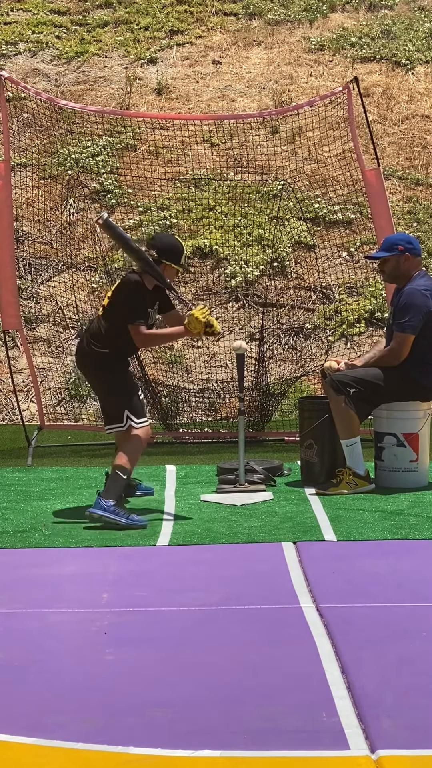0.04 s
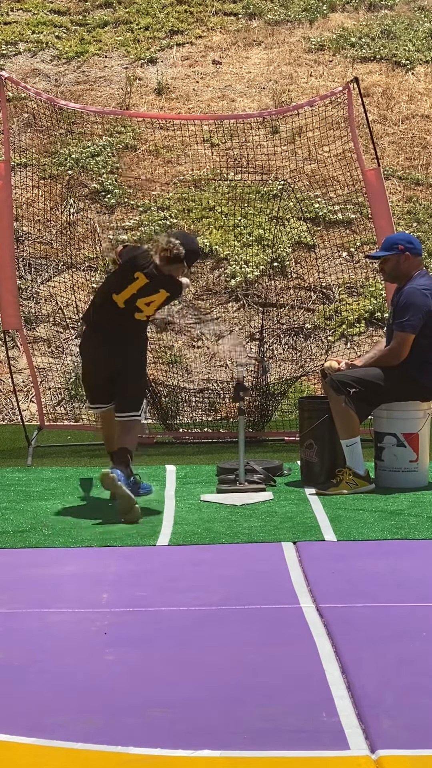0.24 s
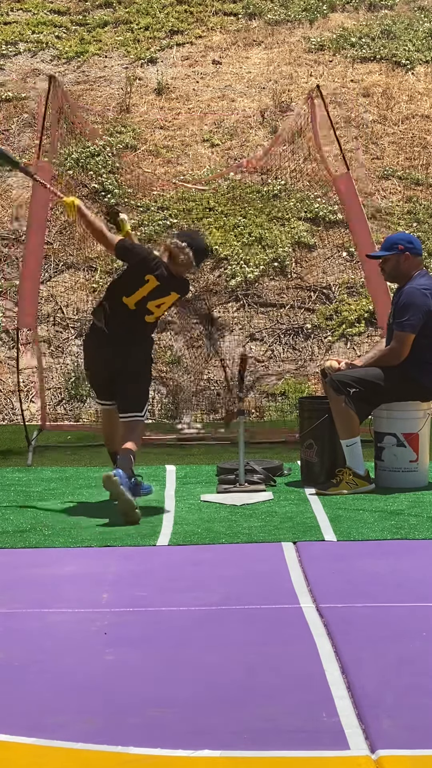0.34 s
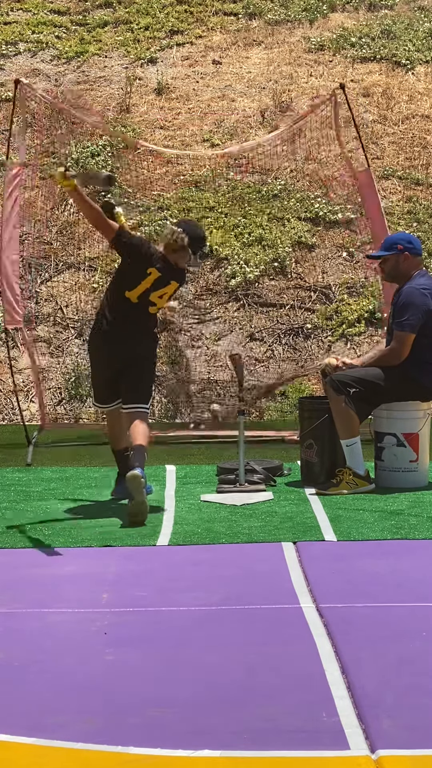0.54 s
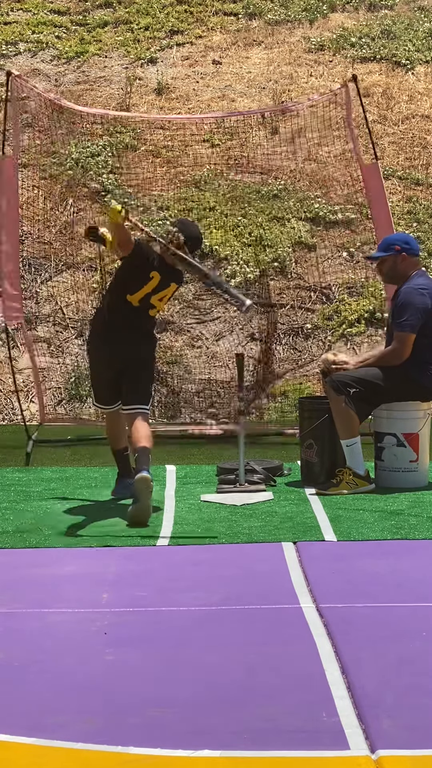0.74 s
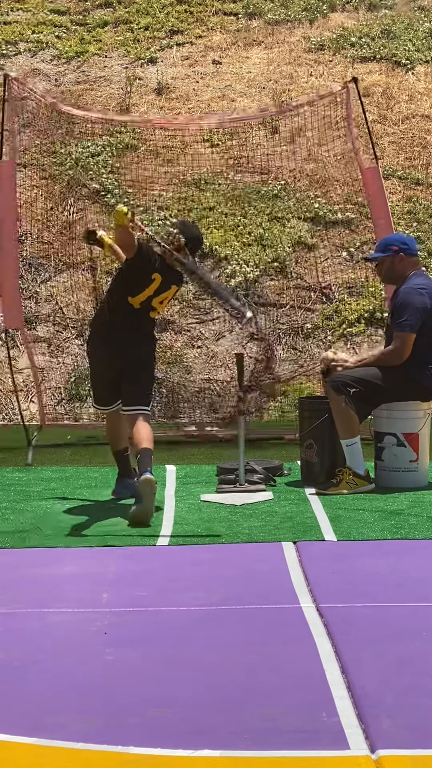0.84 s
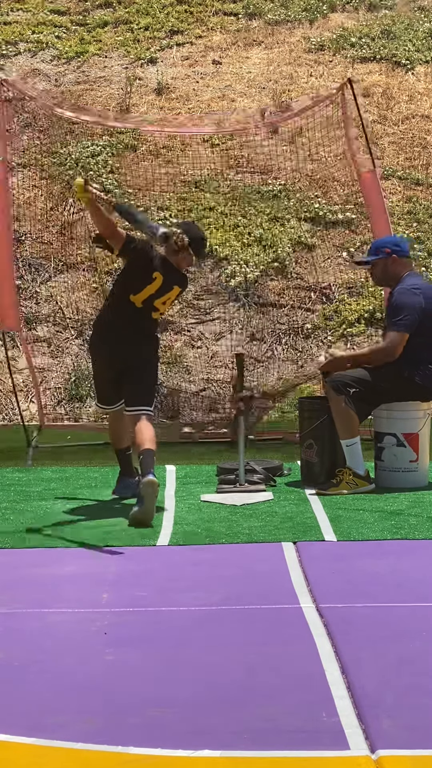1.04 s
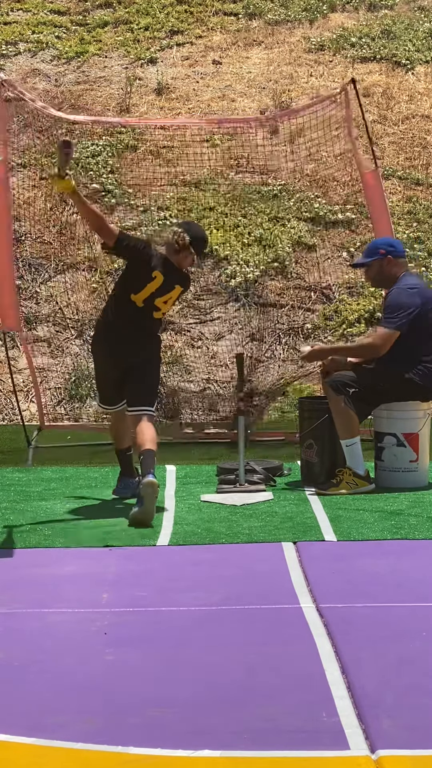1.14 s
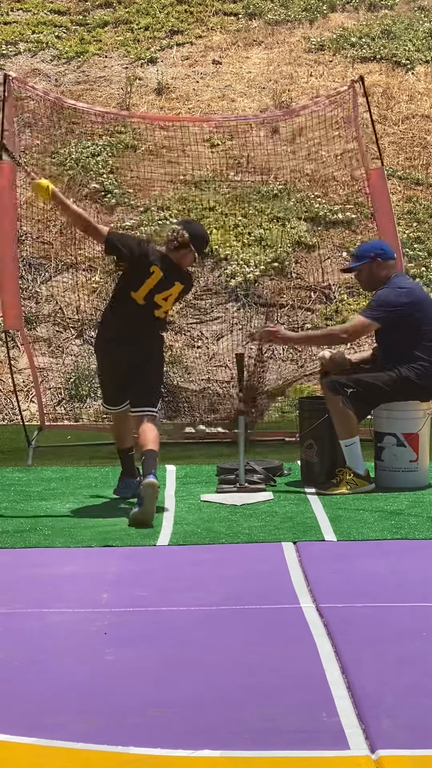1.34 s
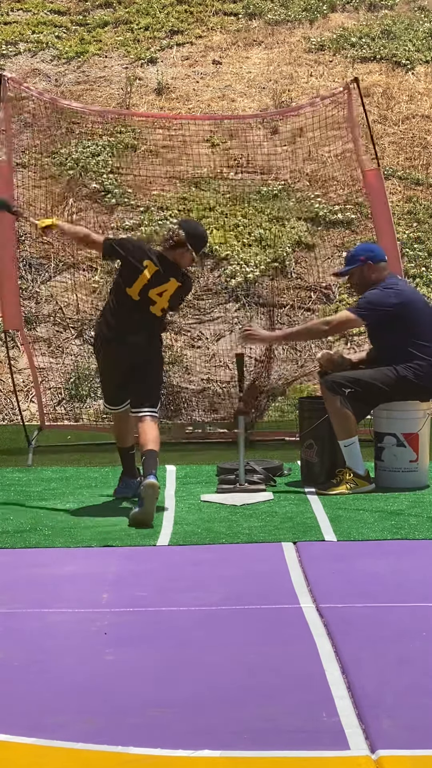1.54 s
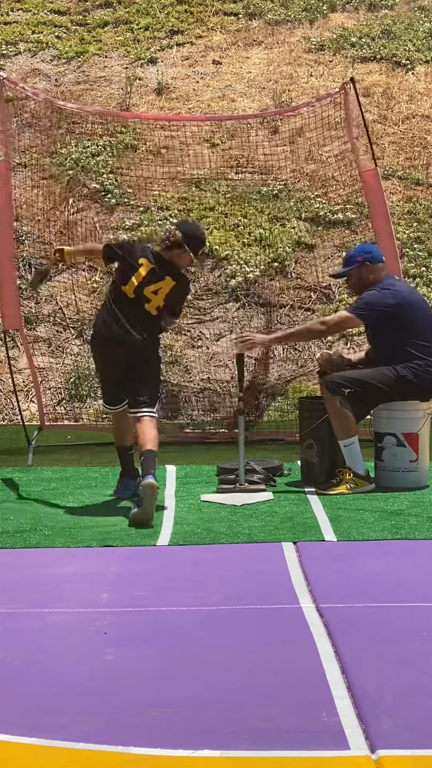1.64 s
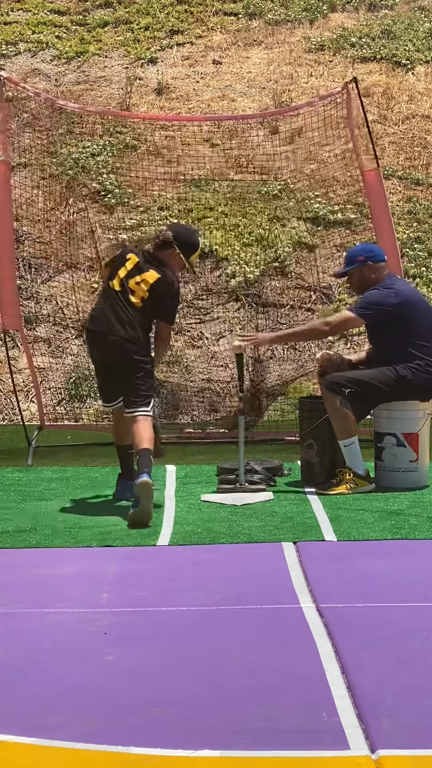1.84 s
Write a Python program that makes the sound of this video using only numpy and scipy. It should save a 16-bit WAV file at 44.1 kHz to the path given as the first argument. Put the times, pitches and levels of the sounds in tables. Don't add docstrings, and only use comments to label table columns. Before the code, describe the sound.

Single hard metallic bat crack after a brief quiet moment, its ping bending up then down, tee and net rattling just after, a few soft later knocks, over low outdoor hum on a small stereo microphone.

```python
import sys
import numpy as np
from scipy import signal
from scipy.fft import rfft, irfft, next_fast_len
from scipy.io import wavfile

SR = 44100
rng = np.random.default_rng(int(sys.argv[2]) if len(sys.argv) > 2 else 0)


def volts_from_db(level):
    exponent = np.asarray(level, float) / 20
    return 10 ** exponent


def wrap_up_sound(samples):
    columns = np.atleast_2d(samples).T
    tamed = np.clip(columns, -1, 1)
    steps = np.round(tamed * 32767).astype(np.int16)
    wavfile.write(sys.argv[1], SR, steps)


N = 83790
HIT_S = .2243


def rms_one(x):
    return x / np.sqrt(np.mean(x ** 2) + 1e-20)


def since(s):
    return np.maximum(np.arange(N) / SR - s, 0)


def in_time(rows):
    s, *columns = np.transpose(rows)
    return [np.interp(np.arange(N) / SR, s, c) for c in columns]


def at_hz(points, hz):
    points = np.array(points)
    return np.interp(np.log(hz), np.log(points[:, 0]), points[:, 1])


def bandpass(x, low, high):
    return signal.sosfilt(signal.butter(2, [low, high], "band", fs=SR, output="sos"), x)


def slow(rate_hz):
    r = np.exp(-2 * np.pi * rate_hz / SR)
    settled = signal.lfilter([1], [1, -2 * r, r * r], rng.standard_normal(N + SR))[SR:]
    return rms_one(settled)


def decay(s, db, t60):
    return volts_from_db(db - 60 * np.minimum(since(s) / t60, 5))


def struck(s, hz, db, t60, rise_s):
    t = since(s)
    return decay(s, db, t60) * (1 - np.exp(-t / rise_s)) * np.sin(2 * np.pi * hz * t)


# [f/Hz, coherence 0-1]
COHERENCE = [(60, .998), (130, .99), (290, .88), (640, .15), (1150, .1), (1450, .85), (1700, .997),
             (12000, .995)]


def banded(spectrum, patchy_db):
    out, power = 0, 0
    edges = 22 * 2 ** np.arange(0, 9.6, .5)
    white = rng.standard_normal((2, 2, N))
    for k, (low, high) in enumerate(zip(edges, edges[1:])):
        mid, side = bandpass(white[k % 2], low, high)
        hz = np.sqrt(low * high)
        alike = np.clip(at_hz(COHERENCE, hz), 0, 1)
        stereo = np.sqrt(1 + alike) * mid + np.sqrt(1 - alike) * side * [[1], [-1]]
        band = volts_from_db(at_hz(spectrum, hz) + patchy_db * slow(11)) * stereo
        out = out + band
        power = power + (low > 120) * np.mean(band ** 2)
    return out / np.sqrt(power)


# [f/Hz, level/dB]
AIR = [(25, -21.5), (55, -8.5), (120, -14), (250, -26), (1000, -34.5), (2000, -44.5), (6000, -48),
       (15500, -63)]
# [t/s, level/dB]
DRONE = [
    (0.0, -56),
    (1.21, -59.5),
    (1.402, -58.5),
    (1.54, -49.5),
    (1.698, -50.5),
    (1.9, -53),
]
MOTOR_MULTIPLES = (3, 4.07, 14, 17, 18, 19, 23, 24)
# [level/dB, left-right difference/dB]
MOTOR = [(-69.5, 2), (-66, 6), (-79.5, 7.5), (-82, 13), (-74, 22.5), (-82.5, 11.5), (-81.5, 9), (-87, 5.5)]


def background():
    drone_hz, motor_hz, air_db = 101.5, 58.94, -59
    air = volts_from_db(air_db) * banded(AIR, patchy_db=0.0)
    drone_db, = in_time(DRONE)
    phase = 2 * np.pi * np.cumsum(drone_hz + 6.0 * slow(3.2)) / SR
    drone = 1.6 * volts_from_db(drone_db + 2.984 * slow(7.3)) * np.sin(phase)
    motor = 0
    for k, (db, pan_db) in zip(MOTOR_MULTIPLES, MOTOR):
        sides = volts_from_db(db + 2 + np.array([[0], [-pan_db]]))
        motor = motor + sides * np.sin(2 * np.pi * motor_hz * k * since(0) + k)
    return air + drone + motor


# [t/s, peak level/dB, f/Hz]
TICKS = [(.028, -59, 4900), (.163, -50, 4820), (.166, -52.5, 5400), (.483, -58.5, 5500),
         (0.664, -59.5, 5514), (.73, -57.5, 4544), (0.242, -32.5, 5400), (0.271, -40.5, 5500),
         (0.296, -41, 4548)]
# [t/s, length/s, level/dB]
SCUFFS = [
    (.0, .09, -64),
    (0.105, 0.21, -61),
    (0.499, 0.3, -65.5),
    (0.753, 0.36, -70),
    (1.257, .15, -69.5),
]


def turf():
    noise, out = rng.standard_normal((2, N)), 0
    for s, db, hz in TICKS:
        burst = noise[0] * (since(s) > 0) * decay(s, db, t60=0.016)
        out = out + 2 * bandpass(burst, hz / 1.8, hz * 1.5)
    swell = 0
    for s, length, db in SCUFFS:
        swell = swell + volts_from_db(db) * np.sin(np.pi * np.clip(since(s) / length, 0, 1))
    hiss = bandpass(noise[1] * volts_from_db(2.5 * slow(150)), 1500, 9500)
    return out + swell * hiss


def blur(phase, width_hz):
    return slow(width_hz) * np.cos(phase) + slow(width_hz) * np.sin(phase)


# [t/s, f/Hz, level/dB]
SWING = [
    (.245, 1925, -32),
    (.28, 1935, -39.5),
    (.315, 1945, -39.5),
    (.33, 1960, -49.5),
    (.37, 1990, -47.5),
    (.415, 2060, -47.5),
    (.445, 2057, -53),
    (.5, 1980, -58),
    (.6, 1950, -67.5),
]


def swing_ring():
    lower_ratio, lower_db = .66, -7.5
    echo_hz, echo_db, echo_width_hz = 1925, -1.5, 76.7
    hz, db = in_time(SWING)
    phase = 2 * np.pi * np.cumsum(hz) / SR
    gate = np.clip(since(0.21) / 0.0067, 0, 1) * volts_from_db(-150 * since(SWING[-1][0]))
    ping = 0.705 * np.sin(phase) + .6 * blur(phase, width_hz=36.3)
    lower = volts_from_db(lower_db) * blur(lower_ratio * phase, echo_width_hz)
    echo = volts_from_db(echo_db) * blur(2 * np.pi * echo_hz * since(0), echo_width_hz)
    return volts_from_db(db) * gate * (ping + lower + echo)


# [f/Hz, level/dB, t60/s]
CRACK = [(2147, -25, .015), (2870, -19.5, .02), (3025, -23.5, .05), (3685, -16.5, 0.024),
         (5220, -23, 0.026), (5448, -19.5, 0.017), (6050, -20, 0.023), (7210, -12, 0.01),
         (8230, -26.5, 0.0086), (9500, -29.5, 0.018)]
BARREL_HZ = (420, 580, 690, 1005, 1275, 1500, 1800, 1918, 2010, 2117, 2510)
# [level/dB, t60/s]
BARREL = [(-37, 0.071), (-19.5, 0.026), (-32, .05), (-20.5, 0.048), (-4, 0.021), (-17, 0.024),
          (-15.5, 0.044), (-5, 0.077), (-16, 0.097), (-18.5, .05), (-22.5, 0.036)]


def hit():
    squashed_s = HIT_S + .0009
    spread_db = 3 * np.array([[.5], [-.5]])
    crack = 0
    for k, (hz, db, t60) in enumerate(CRACK):
        crack = crack + struck(HIT_S, hz, db, t60, rise_s=.0001) * volts_from_db(spread_db * (-1) ** k)
    barrel = 0
    for hz, (db, t60) in zip(BARREL_HZ, BARREL):
        barrel = barrel + struck(squashed_s, hz, db, t60, rise_s=.0006)

    t = since(squashed_s)
    from_hz, to_hz, sag_s = 710, 105, 0.0032
    push_hz = to_hz + (from_hz - to_hz) * np.exp(-t / sag_s)
    push = volts_from_db(-15 - 60 * t / 0.051) * np.sin(2 * np.pi * np.cumsum(push_hz * (t > 0)) / SR)

    touched = since(HIT_S) > 0
    slap = rng.standard_normal(N) * touched * decay(HIT_S, db=-14, t60=0.0086)
    spark = bandpass(rng.standard_normal((2, N)), 9500, 15800) * touched * decay(HIT_S, db=-32, t60=.007)
    return spark + crack + barrel + push + bandpass(slap, 900, 8550)


# [f/Hz, level/dB]
EARLY = [(90, -39.5), (160, -12), (700, -15), (1300, -15), (1600, -23.5), (2400, -18.5), (9300, -33),
         (15000, -52)]
# [f/Hz, level/dB]
LATE = [(180, -50.5), (350, -16.5), (1300, -14.5), (1600, -21.5), (2400, -19), (5500, -29), (11000, -40),
        (15000, -56.5)]


def scatter():
    t = since(HIT_S)
    early = volts_from_db(-60 * t / .14) * banded(EARLY, patchy_db=1.5)
    late = volts_from_db(-10 - 60 * t / 0.87) * banded(LATE, patchy_db=0.0)
    rise = 1 - np.exp(-t / .002)
    return volts_from_db(-30) * rise * (early + late) * volts_from_db(1.8 * slow(90))


# [t/s, peak level/dB, f/Hz, t60/s]
KNOCKS = [(.240, -19, 974, 0.016), (.269, -29, 640, 0.029), (.285, -32.5, 3010, 0.016),
          (.297, -24.5, 900, 0.014), (.315, -35.5, 919, 0.084), (0.325, -34.5, 627, 0.019),
          (0.8034, -36.5, 730, 0.01), (.814, -49, 283, 0.04), (.845, -43, 446, 0.028),
          (.914, -45, 293, 0.049), (0.926, -46, 221.5, 0.073), (1.196, -48, 594, .02),
          (1.21, -49, 380, .03)]


def knocks():
    modes = [(1, 2.5), (0.8, 8.1), (1.2, 7), (0.4, 12)]
    spread = rng.uniform(-1.4, 1, (len(KNOCKS), 4))
    out = 0
    for (s, db, hz, t60), row in zip(KNOCKS, spread):
        for (ratio, loss_db), u in zip(modes, row):
            out = out + struck(s, hz * (ratio + 0.044 * u), db - loss_db, t60 / ratio, rise_s=.001)
    return out


def scene():
    return background() + turf() + swing_ring() + hit() + scatter() + knocks()


# [f/Hz, phase/rad]
TURN = [(1750, .05), (2700, 1.05), (3600, .3), (4500, 1.3), (5250, 2 * np.pi), (5650, 6.4), (6600, 7.25),
        (12000, 3 * np.pi)]


def two_ports(x):
    size = next_fast_len(N + 2048)
    hz = np.arange(size // 2 + 1) * SR / size
    left = volts_from_db(3.2 * np.exp(-np.log((hz + 1) / 480) ** 2))
    right = np.exp(-1j * np.interp(hz, *np.transpose(TURN)))
    resonance = volts_from_db(1 * np.exp(-((hz - 5580) / 350) ** 2))
    return irfft(rfft(x, size) * [left, right] * resonance, size)[:, :N]


def roll_off(x):
    return signal.sosfilt(signal.butter(12, 15960, fs=SR, output="sos"), x)


def record(dry):
    top = 1.3
    cut = signal.sosfilt(signal.butter(2, 28, "high", fs=SR, output="sos"), dry)
    mix = two_ports(top * np.tanh(cut / top))
    return roll_off(mix)


dry = scene()
out = record(dry)
wrap_up_sound(out)
```